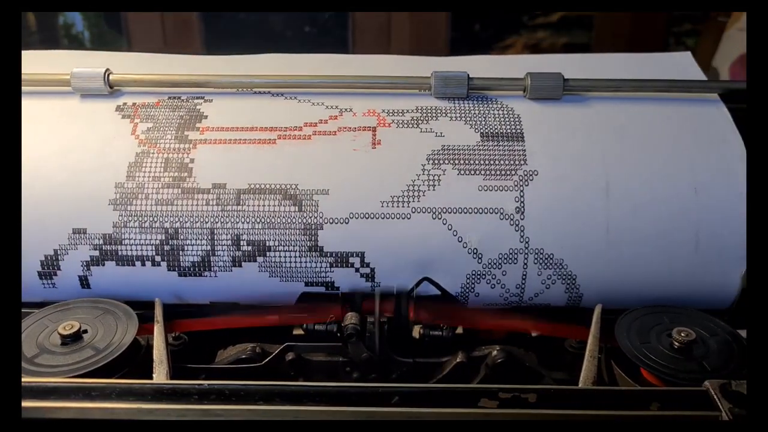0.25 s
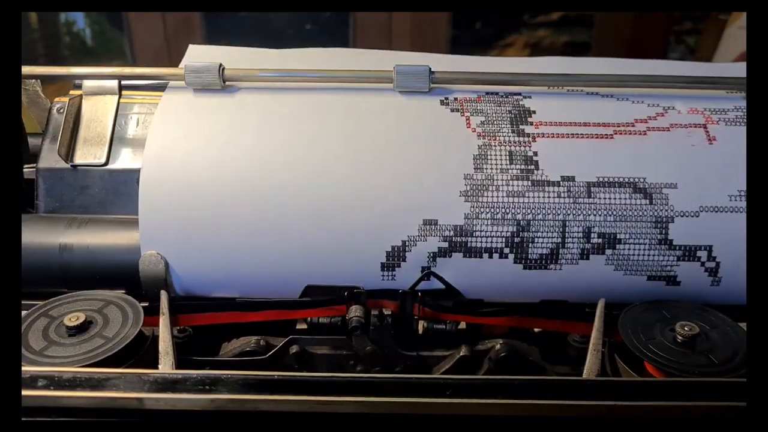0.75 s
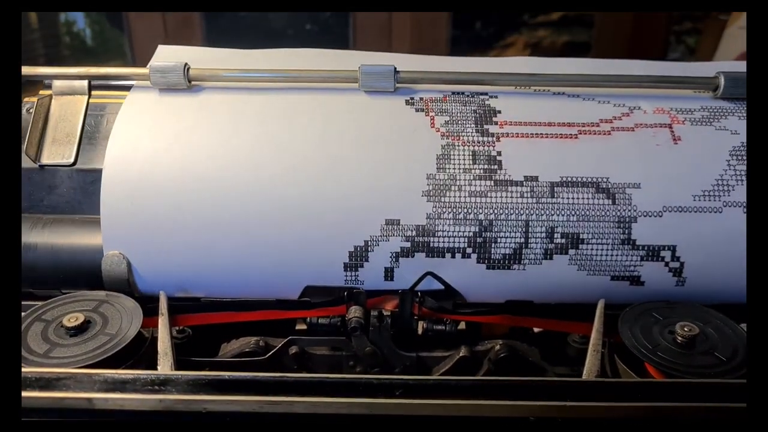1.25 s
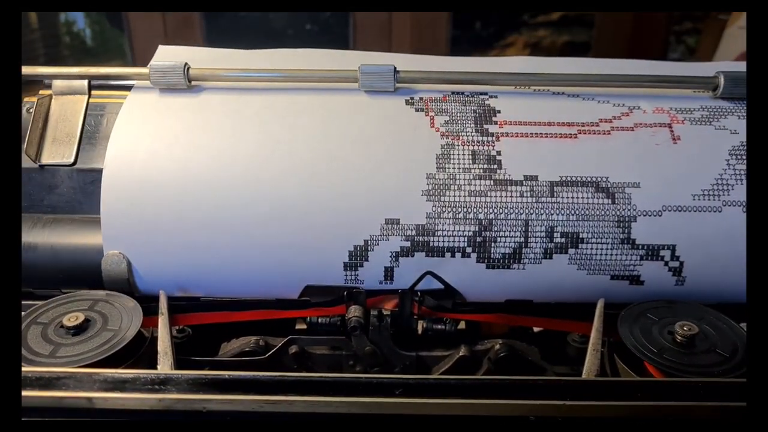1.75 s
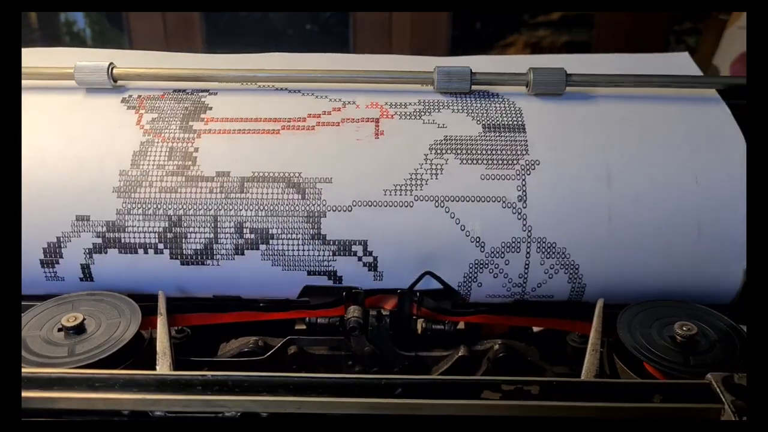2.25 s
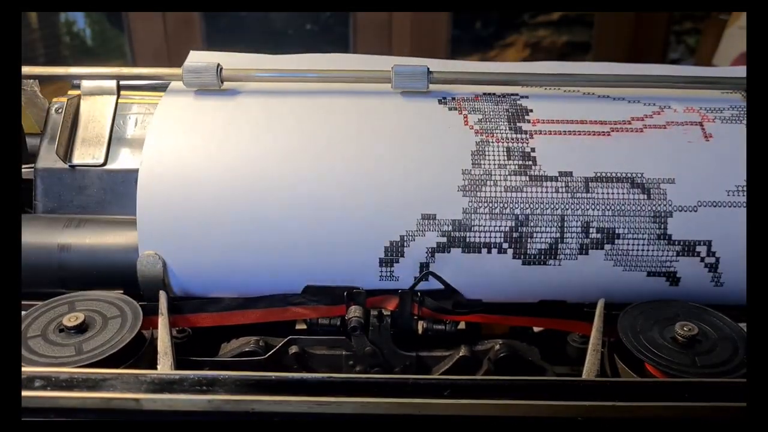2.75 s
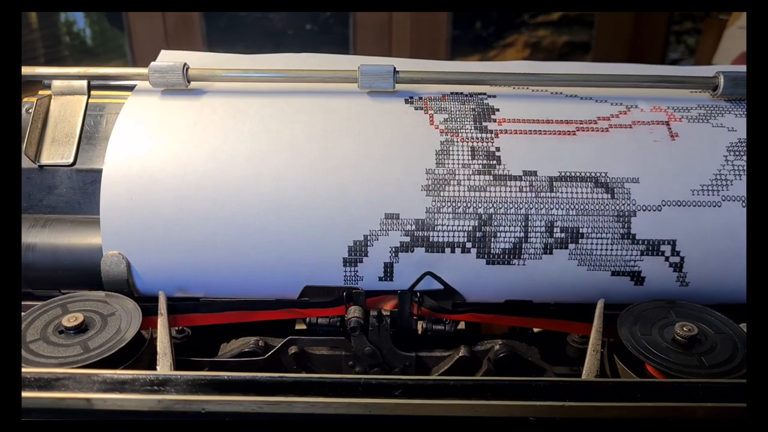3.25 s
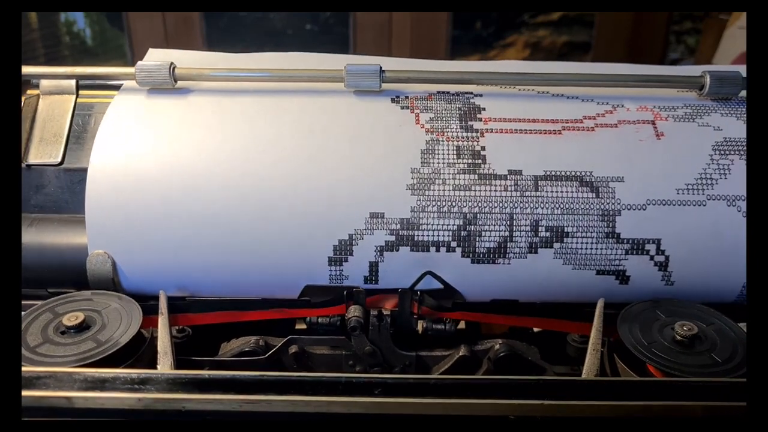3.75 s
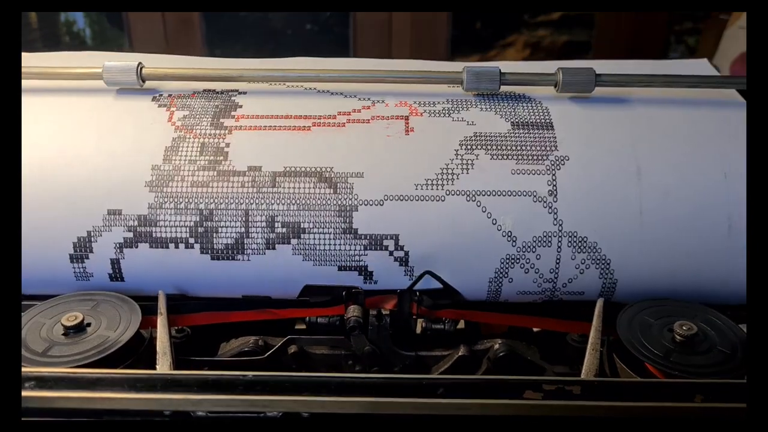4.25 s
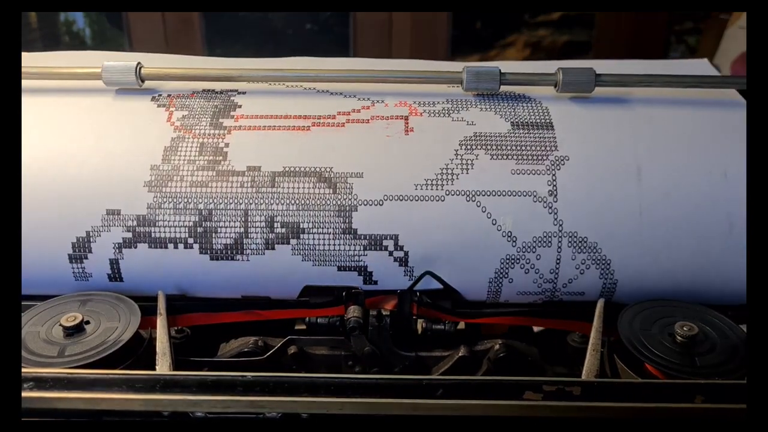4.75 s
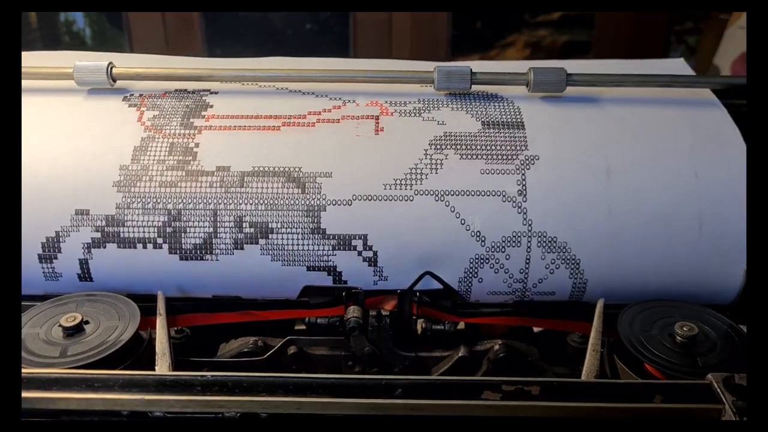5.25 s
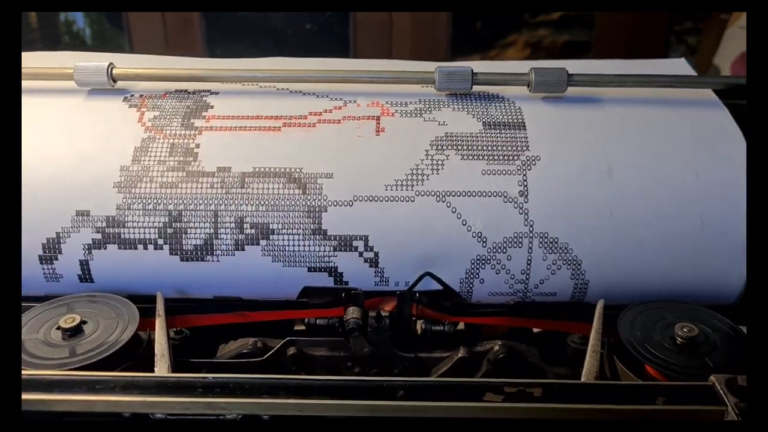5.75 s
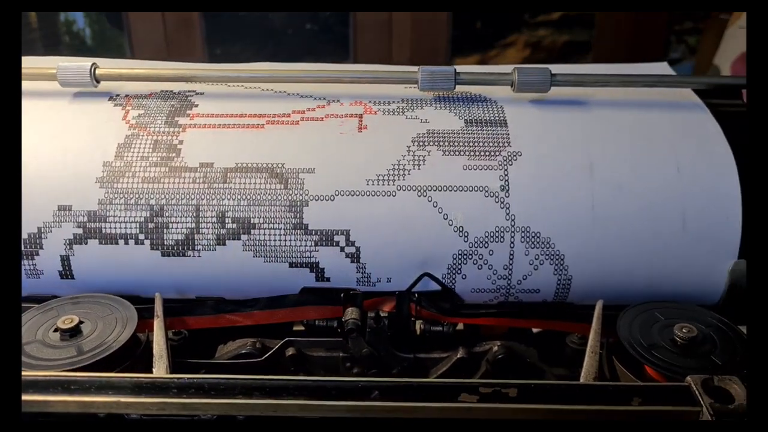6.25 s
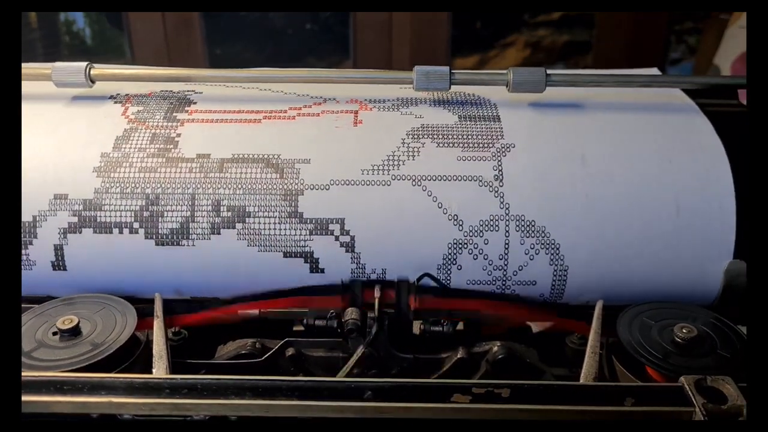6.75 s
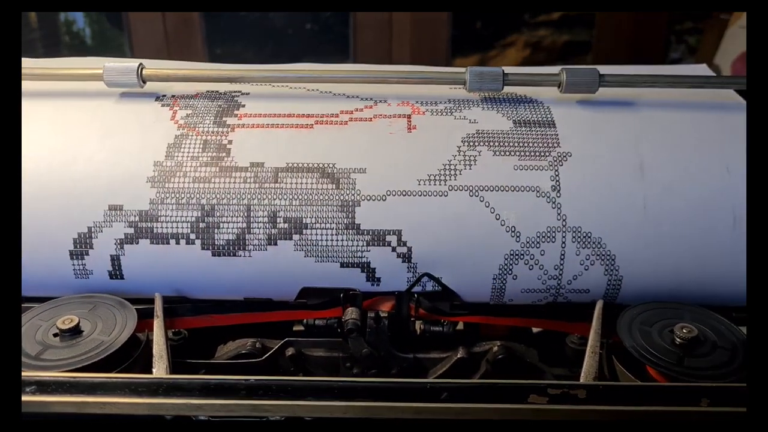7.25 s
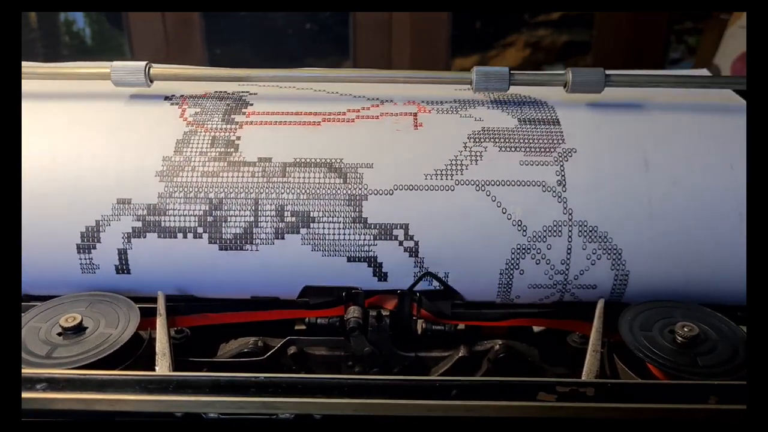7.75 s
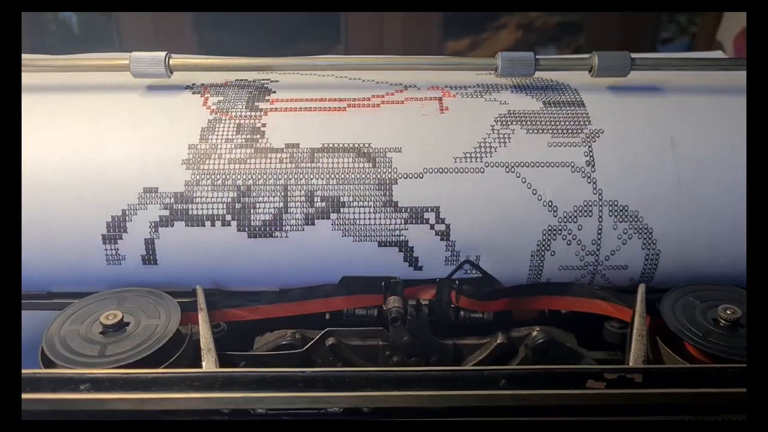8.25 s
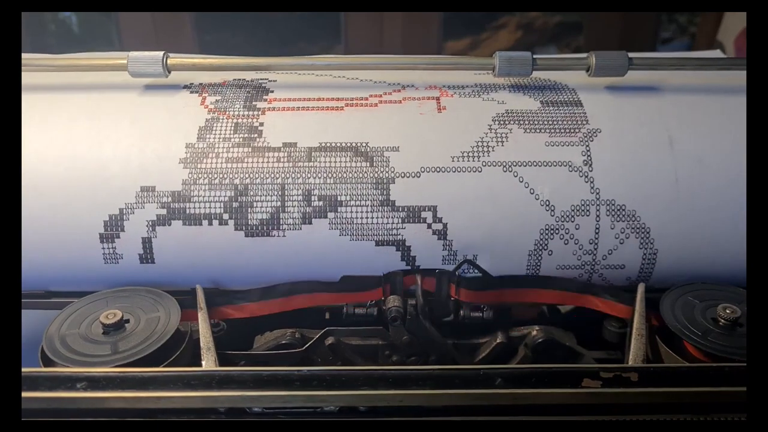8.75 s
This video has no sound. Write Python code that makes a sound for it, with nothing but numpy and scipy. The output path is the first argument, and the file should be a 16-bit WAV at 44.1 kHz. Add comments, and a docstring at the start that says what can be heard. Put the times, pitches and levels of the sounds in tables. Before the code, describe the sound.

A manual typewriter is worked quickly, close to the microphone in a quiet, dry room. It opens with a soft rattle of small clicks, then two sharp strikes at about 0.3 seconds. After a faint carriage scrape, the typing picks up at around 0.9 seconds and continues in an uneven rhythm: bright, dry cracks of type bars on the roller, singly or in quick groups of two or three. Between them come much softer frame knocks, ratcheting clicks and tiny steel ticks, some with a very short metallic ring. The strikes pause for about half a second near 2.5 seconds, where the carriage scrapes lightly, and again near 4.8 seconds. From about 5.2 seconds the typing grows denser, with a rapid run around 6.5 to 7 seconds, and it stays slightly harder until the last strikes at about 9 seconds. A very faint hiss lies underneath.

```python
"""Fast typing on a manual typewriter

The machine stands close to a small microphone in a quiet, dry room. Each type slug strikes the hard
platen, and so brief an impact radiates a bright crack. Levers, escapement and bars falling back knock
the frame, small steel parts tick, and the carriage scrapes along its rail. These forces excite the
damped modes of frame, key levers and type bars, over a faint hiss and a few soft rustles."""
import sys
import numpy as np
from scipy import signal
from scipy.fft import rfft, irfft, next_fast_len
from scipy.io import wavfile
from scipy.ndimage import map_coordinates

SR = 44100
rng = np.random.default_rng(int(sys.argv[2]) if len(sys.argv) > 2 else 0)


def transcribe(u):
    """Save the signal u as a 16-bit wav file named by the first command-line argument.

    u: samples, shape (n,) or (channels, n), limited to [-1, 1]; the rate is SR.
    q: integer samples, one column per channel.
    """
    v = np.clip(np.atleast_2d(u).T, -1, 1)
    q = np.round(v * 32767).astype(np.int16)
    wavfile.write(sys.argv[1], SR, q)


N = 396459

# spectrum of the room's hiss: frequency_hz, relative_density_db
HISS_SPECTRUM = [(18, -36), (30, -10), (160, -11), (1780, -9), (2390, -16), (2580, -11.5), (3280, -9),
                 (4760, -10.5), (6370, -12.5), (17000, -14.5)]
# the fading ring of a keystroke at the very start, then scrapes of carriage and linkage:
# full_strength_s, hold_s, frame_db, steel_db
RING_AND_SCRAPES = [(0, 0.0019, -70, -74), (0.549, 0.025, -88, -72), (0.678, 0.022, -52, -51.5),
                    (0.759, 0.015, -73.5, -60.5), (1.43, 0.013, -110, -76), (2.529, 0.026, -50, -51),
                    (3.849, 0.015, -73.5, -75), (4.311, 0.048, -67, -69.5), (5, 0.0094, -110, -79),
                    (5.777, 0.022, -74, -75), (7.702, 0.088, -59, -69), (8.267, 0.05, -80.5, -81)]
# small steel parts touching: start_s, level_db
TICKS = [(0.0906, -63), (0.0985, -42), (0.1102, -41), (0.1237, -42), (0.1373, -44), (0.15, -39),
         (0.16, -57), (0.177, -52), (0.1841, -40.5), (0.428, -47), (0.4365, -38), (0.5801, -47.5),
         (0.6253, -65), (0.7444, -53), (0.7659, -53), (0.7847, -51), (0.794, -56), (1.1549, -53),
         (1.185, -45.5), (1.2237, -51), (1.2335, -39), (1.26, -45), (1.2658, -36), (1.6638, -49.5),
         (1.6925, -52), (1.6985, -51), (1.71, -52), (1.721, -51.5), (1.7269, -62), (1.7425, -52),
         (1.815, -64), (1.8718, -53), (2.187, -50), (2.2086, -46), (2.2199, -47), (2.232, -51),
         (2.2446, -48), (2.2518, -57), (2.26, -48), (2.332, -60.5), (2.469, -64), (2.4957, -57),
         (2.5764, -52), (2.5815, -60), (2.5858, -66), (2.612, -54), (2.6159, -64), (2.6604, -51.5),
         (2.677, -52), (2.6962, -44), (2.7031, -51), (2.7188, -51), (2.7597, -51), (2.767, -39.5),
         (3.026, -47), (3.0493, -64), (3.0867, -67.5), (3.125, -71), (3.176, -55), (3.2005, -48.5),
         (3.2147, -52), (3.221, -55), (3.2289, -52), (3.238, -47), (3.567, -54), (3.5748, -59),
         (3.5868, -54), (3.6125, -61), (3.6241, -43.5), (3.6455, -55), (3.656, -39.5), (3.707, -54),
         (3.8117, -70), (3.84, -60), (3.8466, -62), (3.8837, -54), (3.8933, -42.5), (3.923, -62),
         (3.9466, -69), (3.96, -52.5), (4.0199, -65), (4.137, -48.5), (4.1674, -60), (4.1716, -47),
         (4.186, -67), (4.2622, -56), (4.2994, -62), (4.3223, -60), (4.33, -58), (4.3477, -64),
         (4.3567, -52), (4.3764, -49), (4.3918, -66), (4.4048, -56.5), (4.4977, -49), (4.5078, -44.5),
         (4.5093, -59), (4.5247, -62), (4.5413, -54), (4.5656, -52), (4.5886, -63), (4.6117, -61.5),
         (4.6215, -64), (4.6302, -68), (4.6413, -60), (4.655, -62), (4.7106, -56), (4.7941, -55),
         (4.7987, -56), (4.8072, -47), (4.8144, -58), (4.836, -43), (4.855, -66), (5.07, -48),
         (5.1422, -65), (5.1627, -69), (5.5637, -41), (5.5722, -38), (5.61, -53), (5.6163, -35.5),
         (5.6265, -38.5), (5.6517, -45), (5.7202, -59), (5.7924, -68), (5.8062, -56), (5.8119, -55),
         (5.864, -63), (5.872, -58), (5.9231, -78), (6.0474, -65.5), (6.291, -51.5), (6.3014, -40),
         (6.4227, -53), (6.5425, -35), (6.6166, -66), (6.6274, -50), (6.6404, -50), (6.654, -45),
         (6.702, -46), (6.7397, -59), (6.8378, -57), (7.0432, -51), (7.0751, -58), (7.098, -61),
         (7.1158, -54), (7.1252, -50.5), (7.1858, -54), (7.1935, -40), (7.24, -68), (7.3362, -58),
         (7.3677, -57.5), (7.4312, -50.5), (7.4436, -63), (7.463, -53), (7.517, -41), (7.5221, -66),
         (7.5353, -51), (7.6923, -54), (7.6985, -56), (7.713, -53), (7.719, -46), (7.7326, -41),
         (7.7455, -50), (7.7581, -44), (7.7727, -43), (7.7893, -41), (7.84, -53.5), (7.8747, -62),
         (7.9601, -58), (7.9726, -57), (7.9793, -55), (8.0513, -66), (8.079, -36), (8.0831, -51),
         (8.212, -61), (8.2734, -60), (8.3033, -50.5), (8.34, -50), (8.353, -47), (8.3593, -64),
         (8.3708, -48), (8.4493, -61), (8.486, -56.5), (8.5234, -55), (8.5313, -56), (8.5584, -52),
         (8.5685, -46), (8.576, -54), (8.581, -41), (8.7115, -66), (8.9697, -63)]
# space bar, ratchet teeth and falling bars knocking the frame: start_s, level_db
KNOCKS = [(0.0919, -53), (0.1032, -48.5), (0.1141, -54), (0.1284, -46.5), (0.1403, -47.5), (0.1533, -48.5),
          (0.178, -59), (0.187, -52), (0.4261, -68), (0.4409, -65), (0.5786, -71), (0.725, -47.5),
          (0.7678, -66), (0.8038, -71), (1.1561, -57), (1.1886, -44.5), (1.2249, -55), (1.2367, -46.5),
          (1.2708, -47.5), (1.6623, -50), (1.6816, -54.5), (1.6914, -49), (1.707, -51.5), (1.7214, -51),
          (1.7309, -55.5), (1.9446, -69), (2.1895, -54), (2.199, -46), (2.2115, -44.5), (2.223, -47.5),
          (2.2356, -44), (2.2484, -45.5), (2.2602, -49), (2.2718, -50), (2.2847, -47.5), (2.5922, -77),
          (2.6106, -56), (2.668, -61.5), (2.6805, -52), (2.7058, -41.5), (2.7214, -47), (2.7582, -55),
          (2.7681, -46), (3.1855, -51.5), (3.196, -44), (3.2112, -42.5), (3.2244, -47), (3.2374, -47.5),
          (3.535, -74), (3.55, -69), (3.579, -66), (3.5928, -59), (3.6242, -66), (3.6446, -55),
          (3.6579, -47.5), (3.7, -72), (3.8702, -45.5), (3.8825, -54), (3.8936, -49.5), (4.0317, -76),
          (4.1127, -73), (4.139, -58), (4.1496, -53.5), (4.1661, -55.5), (4.2983, -50.5), (4.3057, -69),
          (4.317, -57), (4.3346, -58), (4.3438, -48.5), (4.3685, -52.5), (4.4899, -43.5), (4.5065, -44.5),
          (4.518, -42), (4.541, -50.5), (4.552, -65), (4.5622, -56.5), (4.801, -50), (4.8124, -45),
          (4.8247, -43.5), (4.8395, -47), (5.0425, -52), (5.0555, -47), (5.0692, -55), (5.0802, -45),
          (5.5637, -53.5), (5.5771, -46), (5.6163, -50), (5.63, -46), (5.7116, -49.5), (5.8192, -49),
          (5.8767, -63), (6.29, -62), (6.3046, -46.5), (6.4043, -66), (6.4253, -60), (6.6246, -63),
          (6.6394, -51), (7.113, -69), (7.1328, -46.5), (7.1844, -56.5), (7.1953, -47), (7.43, -53),
          (7.4411, -51.5), (7.4483, -71), (7.4597, -56), (7.5157, -44.5), (7.5286, -54), (7.6904, -57),
          (7.7055, -46.5), (7.721, -42), (7.7353, -56), (7.746, -46.5), (7.7625, -48.5), (7.7717, -52),
          (7.7925, -61), (7.8394, -71), (7.9869, -49), (8.0899, -42.5), (8.154, -64), (8.2037, -66),
          (8.28, -75), (8.3141, -56), (8.3401, -50.5), (8.3579, -43.5), (8.3679, -58), (8.53, -73),
          (8.54, -50.5), (8.5578, -52), (8.5714, -46.5), (8.5852, -46.5)]
# modes of frame and platen: pitch_hz, bandwidth_hz, gain_db
FRAME_MODES = [(590.7, 65, -12), (797.4, 92, -3), (934, 154, -0.5), (1149, 162, 1), (1213.7, 141, -1),
               (1534, 65, -5.5), (1897, 88, 0), (2240.5, 57, -0.5)]
# modes of the key levers: pitch_hz, bandwidth_hz, gain_db
LEVER_MODES = [(2858, 290, -2.5), (3410, 920, -8), (4211, 192, 1.5), (4510, 290, -1), (5784, 460, -0.5)]
# mode of the escapement pawl: pitch_hz, bandwidth_hz, gain_db
PAWL_MODES = [(4214, 70, 0)]
# modes of the thin steel type bars: pitch_hz, bandwidth_hz, gain_db
STEEL_MODES = [(6110, 460, -7), (7280, 310, -2.5), (8375, 370, -2.5), (9320, 640, -5), (10400, 540, 2),
               (10860, 910, -0.5), (12400, 290, 1), (14200, 1800, -4), (15500, 2000, -1.5),
               (16600, 500, -27)]
# lone springs or levers ringing out: start_s, pitch_hz, level_db, t60_s
PINGS = [(.1, 2850, -51, 0.045), (.124, 2870, -50, 0.044), (.15, 2850, -53, .04), (.185, 2780, -51, 0.031),
         (0.439, 1560, -52.5, 0.057), (3.593, 1150, -50.5, 0.026), (3.624, 2780, -50, 0.034),
         (5.525, 2750, -73.5, 0.029), (6.302, 2790, -54, 0.055), (6.423, 5800, -37, 0.02),
         (6.426, 1806, -51.5, 0.032), (6.97, 1550, -83, 0.22), (7.14, 5400, -80, 0.38),
         (7.193, 2800, -50, .04), (7.721, 2800, -53, .04), (7.773, 2800, -53, 0.031),
         (7.79, 2820, -48, .04), (8.585, 2760, -45, 0.027)]
# slugs on the platen, each followed by the escapement: start_s, crack_db, lag_ms, escapement_db
STRIKES = [(0.2673, -21, 5.4, -46), (0.2927, -21.5, 6.3, -43.5), (0.8807, -18.5, 8.6, -45),
           (0.922, -19.5, 8, -43), (0.9529, -18.5, 9.3, -46.5), (1.0859, -18.5, 9.1, -47.5),
           (1.3682, -16, 10.1, -45.5), (1.5021, -13.5, 12, -48.5), (1.5787, -15.5, 10.3, -42.5),
           (1.8354, -16.5, 11, -44), (1.8583, -16, 10, -51), (1.8785, -18, 13.3, -43),
           (1.9976, -18.5, 8.2, -45), (2.0307, -17.5, 9.5, -44.5), (2.3761, -18.5, 7.9, -41.5),
           (2.4139, -19.5, 7, -46), (2.9651, -20, 9.7, -47.5), (2.9889, -21, 8.2, -45),
           (3.016, -17.5, 9, -44.5), (3.4478, -15, 10, -44.5), (3.475, -14.5, 8, -48.5),
           (3.497, -16.5, 11.4, -41), (3.75, -16.5, 9.1, -47), (3.7658, -16, 9.2, -51.5),
           (3.783, -16.5, 9.6, -43), (3.9709, -19, 9.8, -45), (3.987, -18, 9.7, -47),
           (4.0036, -20, 8.2, -45.5), (4.2119, -16, 8.9, -45.5), (4.246, -19, 8.1, -46.5),
           (4.2707, -20, 11.6, -46), (4.426, -15.5, 10.4, -45.5), (4.4426, -19, 11.6, -46),
           (4.4591, -18, 12.7, -44), (4.6627, -19.5, 8, -43.5), (4.68, -21, 8.1, -49.5),
           (4.699, -23.5, 8.9, -48), (5.1824, -18, 8.3, -42.5), (5.425, -18, 7.9, -45),
           (5.457, -19.5, 8.2, -46), (5.589, -17.5, 9.2, -50), (5.641, -19, 12.6, -48),
           (5.7396, -18, 11.7, -45), (5.9046, -16, 7.3, -47), (5.9518, -19, 7.2, -41),
           (5.97, -24, 11.6, -45.5), (6.2022, -18, 9.3, -45), (6.3257, -18, 9.5, -44.5),
           (6.3481, -21, 8.3, -47.5), (6.5293, -16, 11.3, -46.5), (6.6622, -17, 10.6, -46),
           (6.6918, -17, 8.4, -49.5), (6.7601, -17.5, 10.8, -53), (6.7897, -17.5, 11, -50.5),
           (6.8248, -17.5, 12.3, -50.5), (6.9248, -17, 8.6, -48), (7.025, -15.5, 11.7, -45),
           (7.2706, -16.5, 9.5, -45), (7.4857, -17, 10.6, -41.5), (7.5843, -15.5, 8.5, -43.5),
           (7.6226, -17.5, 10, -43.5), (7.8897, -16, 9.2, -47), (7.9243, -16, 10.4, -47),
           (8.0704, -13, 9.7, -45.5), (8.1929, -23.5, 17.2, -47.5), (8.4006, -15, 12.6, -48),
           (8.4365, -15.5, 13.4, -49), (8.758, -15, 9.6, -47.5), (8.7901, -16, 9.3, -44),
           (8.9572, -15.5, 10.8, -48.5), (8.9868, -15, 8, -45)]
# where the slugs are heard as the microphone drifts: time_s, left_minus_right_db
STRIKE_PAN = [(0.2, 4.5), (1, -3), (1.6, -2), (3, -1), (4.2, -1.5), (5.5, -1.5), (7.5, -0.5), (8.3, 2.5),
              (9, -3)]
# rustles of paper or hand: centre_s, length_s, centre_hz, level_db
RUSTLES = [(2.171, 0.065, 4370, -82.5), (2.903, 0.033, 4000, -77), (3.165, 0.041, 4550, -89),
           (3.308, 0.03, 9900, -83), (3.36, 0.033, 3700, -84.5), (4.055, 0.053, 3930, -84.5),
           (5.356, 0.02, 4100, -80), (8.185, 0.014, 2540, -69), (8.65, 0.037, 4500, -81),
           (4.764, 0.045, 11000, -83), (5.25, 0.036, 9050, -86), (6.153, 0.017, 4450, -80.5)]


def amp(db):
    """Amplitude ratio of a level in decibels."""
    return 10 ** (np.asarray(db) / 20)


def unit_rms(x):
    """The signal scaled to unit mean power."""
    return x / np.sqrt(np.mean(x ** 2) + 1e-20)


def filtered(x, response):
    """Filtering multiplies the spectrum by a frequency response."""
    size = next_fast_len(N + SR // 4)
    return irfft(rfft(x, size) * response(np.fft.rfftfreq(size, 1 / SR)), size)[..., :N]


def band(x, lo_hz, hi_hz, order=3):
    """A Butterworth band-pass."""
    return signal.sosfilt(signal.butter(order, [lo_hz, hi_hz], "bandpass", fs=SR, output="sos"), x)


def impulses(start_s, gain):
    """An ideal impact is one impulse at its instant."""
    index = np.clip(np.round(start_s * SR).astype(int), 0, N - 1)
    return np.bincount(index, gain * np.ones(len(index)), N)


def blows(start_s, level_db, rise_s, t60_s):
    """Force envelopes superpose: each rises to its level and decays exponentially."""
    t = np.arange(SR // 10) / SR
    shape = (1 - np.exp(-t / rise_s)) * amp(-60 * t / t60_s)
    return np.abs(signal.oaconvolve(impulses(start_s, amp(level_db)), shape / shape.max())[:N])


def stereo_noise(correlation):
    """Sum and difference of two white noises give partly coherent channels."""
    angle = np.arccos(correlation) / 2
    mid, side = rng.standard_normal((2, N))
    return np.cos(angle) * mid + np.sin(angle) * np.array([side, -side])


def wander(step_samples):
    """A smooth curve through Gaussian random values."""
    return map_coordinates(rng.standard_normal(N // step_samples + 4), [np.arange(N) / step_samples])


def resonate(modes, force, contact_s, scatter_db):
    """Modal superposition: a force drives damped resonators, and each contact shares it out anew."""
    share = amp(scatter_db * rng.standard_normal((len(contact_s) + 1, len(modes))))
    latest_contact = np.searchsorted(contact_s * SR, np.arange(N))
    out, power = 0, 0
    for k, (pitch_hz, bandwidth_hz, gain_db) in enumerate(modes):
        radius = np.exp(-np.pi * bandwidth_hz / SR)
        poles = [1, -2 * radius * np.cos(2 * np.pi * pitch_hz / SR), radius * radius]
        motion = signal.lfilter([1 - radius, 0, radius - 1], poles, force * share[latest_contact, k])
        out = out + (-1) ** k * amp(gain_db) * motion
        power += (1 - radius) * amp(gain_db) ** 2
    return out / np.sqrt(power)


def room_hiss():
    """Room and microphone set a broadband noise floor, whose level wavers slightly."""
    level_db = -88.5 + 1.8 * wander(2000)
    point_hz, density_db = np.transpose(HISS_SPECTRUM)
    hiss = filtered(stereo_noise(0.084),
                    lambda hz: amp(np.interp(np.log(hz + 1), np.log(point_hz + 1), density_db)))
    return amp(level_db) * unit_rms(hiss)


def ring_and_scrape_forces(rise_db_per_s=906, fall_db_per_s=605.5, catch_db=0.83):
    """A keystroke's ring decays; later, sliding friction swells, holds and fades with small catches."""
    t, force = np.arange(N) / SR, np.zeros((3, N))
    for full_s, hold_s, frame_db, steel_db in RING_AND_SCRAPES:
        near = slice(max(0, round((full_s - .1) * SR)), round((full_s + hold_s + .15) * SR))
        age_s = t[near] - full_s
        loss_db = np.maximum(0, np.maximum(-rise_db_per_s * age_s, fall_db_per_s * (age_s - hold_s)))
        lever_db = (frame_db + steel_db) / 2 - 3.5
        force[:, near] += amp(np.array([[frame_db], [lever_db], [steel_db]]) - loss_db)
    return force * amp(catch_db * wander(100))


def mechanism():
    """Forced vibration: noise shaped by the contact forces drives frame, levers and type bars."""
    strike_s, *_ = np.transpose(STRIKES)
    (knock_s, frame_db, lever_db), (tick_s, tick_db) = small_contacts()
    on_frame, on_levers, on_steel = (ring_and_scrape_forces() + tick_forces(tick_s, tick_db)
                                     + knock_forces(knock_s, frame_db, lever_db) + bar_forces(strike_s))
    # a clean impulse starts the ringing; the pawl is driven by impulses alone
    frame_kicks = impulses(knock_s, amp(frame_db + 20.5)) + impulses(strike_s, amp(-32))
    lever_kicks = impulses(knock_s, amp(lever_db + 11))
    pawl_kicks = impulses(knock_s, amp(frame_db + 7)) + impulses(strike_s, amp(-38.5))
    contact_s = np.sort(np.r_[strike_s, knock_s]) - .001  # modal shares change just ahead of a blow
    frame = resonate(FRAME_MODES, on_frame * stereo_noise(0.94) + frame_kicks, contact_s, 2.08)
    levers = resonate(LEVER_MODES, on_levers * stereo_noise(0.88) + lever_kicks, contact_s, 1.5)
    pawl = resonate(PAWL_MODES, pawl_kicks, contact_s, scatter_db=4.5)
    steel = resonate(STEEL_MODES, on_steel * stereo_noise(0.33), contact_s, scatter_db=3.5)
    ringing = band(frame, 480, 13000) + levers + pawl + steel
    return ringing + clatter(on_frame, on_levers, on_steel) + table_thud(on_frame)


def clatter(on_frame, on_levers, on_steel):
    """Modal overlap: the many parts without a clear ring merge into broad bands of noise."""
    low = band(on_frame * stereo_noise(0.96), 810, 2480)
    middle = band(on_levers * stereo_noise(0.34), 2500, 8800)
    high = band(on_steel * stereo_noise(0.57), 6500, 15000, order=5)
    return low + amp(-1.5) * middle + amp(-5) * high


def table_thud(on_frame):
    """Structure-borne sound passes from the frame to the table, which radiates a weak thud."""
    body = band(on_frame * stereo_noise(0.49), 110, 500)
    bass = band(on_frame * stereo_noise(0.78), 31, 88, order=2)
    return amp(-15.5) * (body + bass)


def small_contacts():
    """Secondary impacts join the knocks and ticks: the escapement steps, and loose parts settle."""
    strike_s, _, lag_ms, escapement_db = np.transpose(STRIKES)
    knock_s, knock_db = np.transpose(KNOCKS)
    tick_s, tick_db = np.transpose(TICKS)
    blow_s = np.r_[strike_s + lag_ms / 1000, knock_s]
    frame_db = np.r_[escapement_db, knock_db]
    settle_s = blow_s + rng.uniform(0.0091, 0.024, len(blow_s))
    settle_scatter, lever_scatter = rng.standard_normal((len(blow_s), 2)).T
    settle_db = frame_db - 29.5 + 7.5 * settle_scatter
    lever_db = np.r_[escapement_db - 7.5, knock_db - 14.5] + 3 * lever_scatter
    knocks = np.r_[blow_s, settle_s], np.r_[frame_db, settle_db], np.r_[lever_db, settle_db - 14.5]
    # frame knocks and settling parts also tick the thin steel
    ticks = np.r_[tick_s, knock_s, settle_s], np.r_[tick_db, knock_db - 3, settle_db]
    return knocks, ticks


def tick_forces(start_s, level_db):
    """Ticks load frame, levers and steel; the jangle is nonlinear, so light ticks stay dry."""
    frame = blows(start_s, level_db - 20.5, rise_s=0.001, t60_s=0.02)
    levers = blows(start_s, level_db - 13.5, rise_s=0.0001, t60_s=0.033)
    touch = blows(start_s, level_db + 2, rise_s=0.0001, t60_s=0.0039)
    jangle = blows(start_s, 1.417 * level_db + 7, rise_s=0.005, t60_s=0.027)
    return np.array([frame, levers, touch + jangle])


def knock_forces(start_s, frame_db, lever_db):
    """An impact loads frame and levers abruptly, and the frame keeps chattering faintly."""
    frame = blows(start_s, frame_db - 4, rise_s=0.00067, t60_s=0.027)
    chatter = blows(start_s, frame_db - 31.5, rise_s=0.0096, t60_s=0.082)
    levers = blows(start_s, lever_db, rise_s=0.00016, t60_s=0.036)
    return np.array([frame + chatter, levers, np.zeros(N)])


def pings(rise_s=0.00021):
    """Free vibration: a lone spring or lever rings as a damped sinusoid."""
    out, t = np.zeros(N), np.arange(SR // 4) / SR
    for start_s, pitch_hz, level_db, t60_s in PINGS:
        envelope = amp(level_db - 60 * t / t60_s) * (1 - np.exp(-t / rise_s))
        out[round(start_s * SR):][:len(t)] += envelope * np.sin(2 * np.pi * pitch_hz * t)
    return out


def bar_forces(strike_s, level_db=-36.5):
    """A type bar brushes its guide, lands, shivers and jangles; coupling shakes frame and levers too."""
    brush = blows(strike_s - .003, level_db - 19.5, rise_s=0.00078, t60_s=0.023)
    shiver = blows(strike_s, level_db, rise_s=0.000079, t60_s=0.0094)
    jangle = blows(strike_s, level_db - 6.5, rise_s=0.0035, t60_s=0.035)
    frame = blows(strike_s, level_db - 11, rise_s=0.000057, t60_s=0.022)
    levers = blows(strike_s, level_db - 12, rise_s=0.00007, t60_s=0.033)
    return np.array([frame + amp(-18.5) * brush, levers + amp(-11) * brush, brush + shiver + jangle])


def cracks(rebound_s=0.0011, rebound_db=-11.5, pan_scatter_db=1.5):
    """A brief contact has a wide spectrum: slug on platen gives a bright pulse, a tick a small one."""
    strike_s, crack_db, *_ = np.transpose(STRIKES)
    tick_s, tick_db = np.transpose(TICKS)
    pan_db = np.interp(strike_s, *np.transpose(STRIKE_PAN))
    pan_db += pan_scatter_db * rng.standard_normal(len(strike_s))
    impacts = np.array([impulses(strike_s, amp(crack_db + side * pan_db / 2)) for side in (1, -1)])
    impacts += impulses(strike_s + rebound_s, amp(crack_db + rebound_db))  # the slug touches once more
    impacts += impulses(tick_s, amp(tick_db + 5))
    t = np.arange(-40, 41) / SR
    phase_rad = np.array([[0.28], [-0.28]])  # the channels are a little out of step
    bright = -np.exp(-(t / 0.000074) ** 2) * np.cos(2 * np.pi * 11700 * t + phase_rad)
    broad = amp(-15.5) * np.exp(-(t / 0.00006) ** 2) * np.sin(2 * np.pi * 6000 * t)
    return signal.oaconvolve(impacts, bright + broad, "same", axes=1)


def rustles():
    """Light friction of paper or hand gives soft swells of band-limited noise."""
    out, t = np.zeros((2, N)), np.arange(N) / SR
    for centre_s, length_s, centre_hz, level_db in RUSTLES:
        near = slice(round((centre_s - .1) * SR), round((centre_s + 0.081) * SR))
        swell = amp(level_db) * np.exp(-(2 * (t[near] - centre_s) / length_s) ** 2)
        noise = band(rng.standard_normal((2, len(swell))), centre_hz / 1.32, centre_hz * 1.36, order=2)
        out[:, near] += swell * unit_rms(noise)
    return out


def scene():
    """Superposition: the pressures of all sources add."""
    return mechanism() + pings() + cracks() + room_hiss() + rustles()


def record(dry, top_hz=17100, taper_hz=900):
    """Band limiting: a raised-cosine low-pass keeps nothing above the top frequency."""
    return filtered(dry, lambda hz: np.sin(np.pi / 2 * np.clip((top_hz - hz) / taper_hz, 0, 1)) ** 2)


dry = scene()
out = record(dry)
transcribe(out)
```